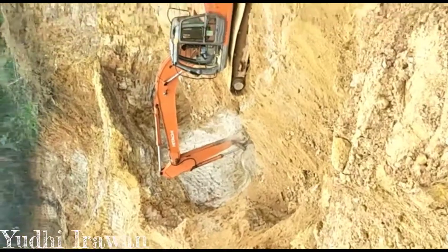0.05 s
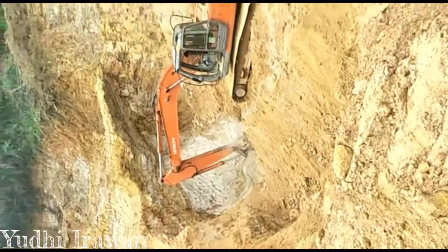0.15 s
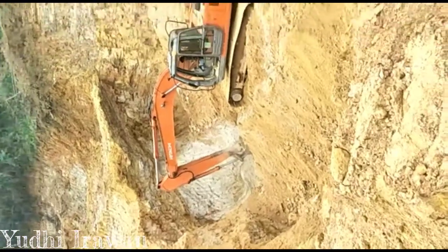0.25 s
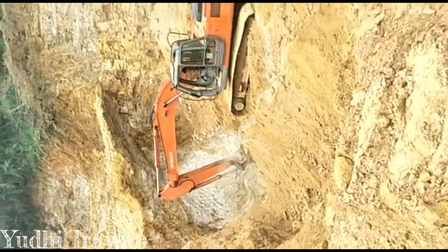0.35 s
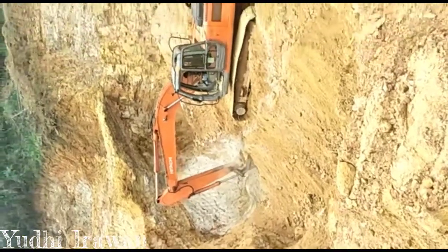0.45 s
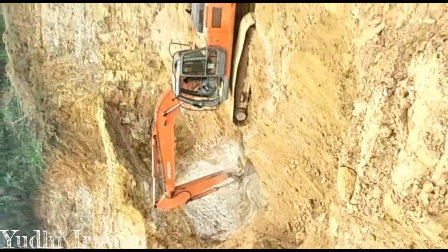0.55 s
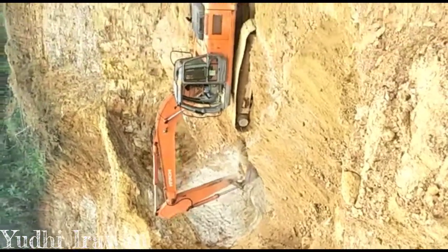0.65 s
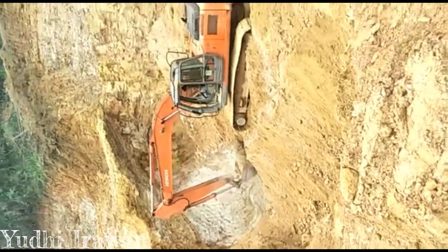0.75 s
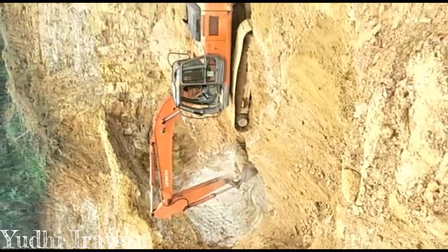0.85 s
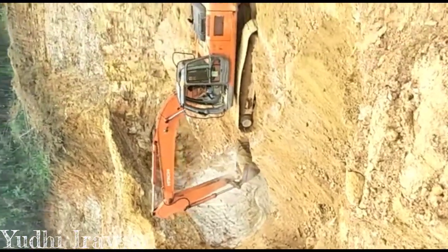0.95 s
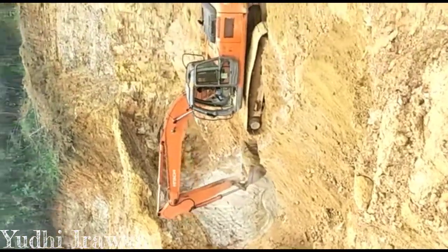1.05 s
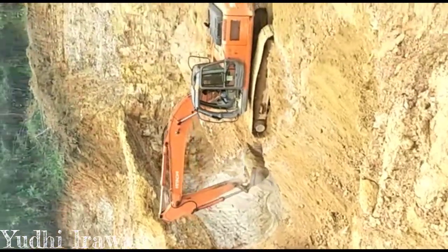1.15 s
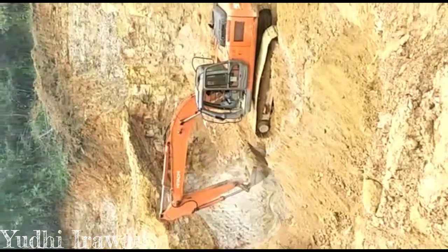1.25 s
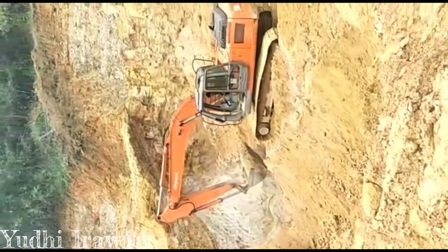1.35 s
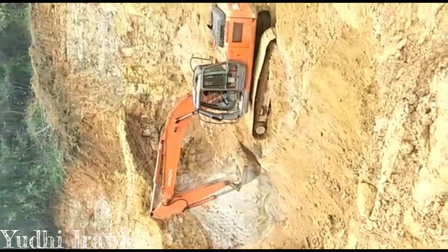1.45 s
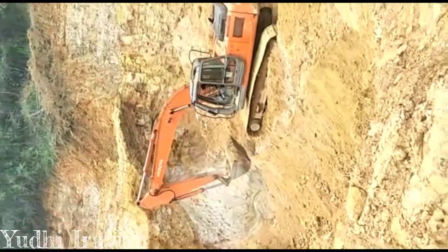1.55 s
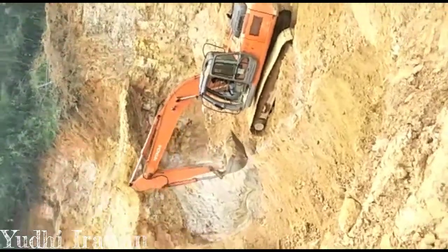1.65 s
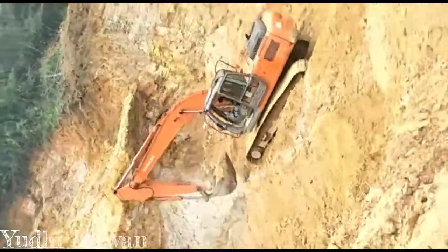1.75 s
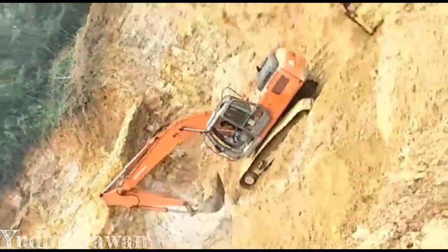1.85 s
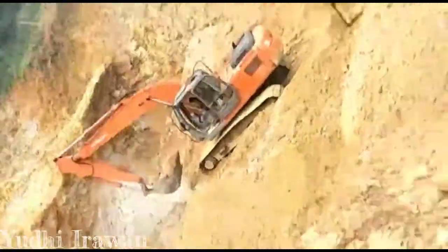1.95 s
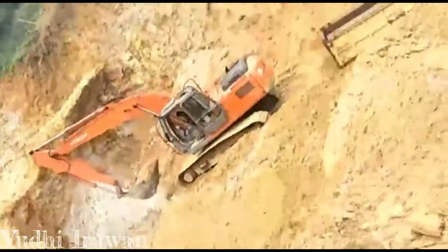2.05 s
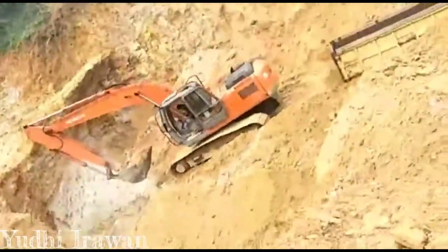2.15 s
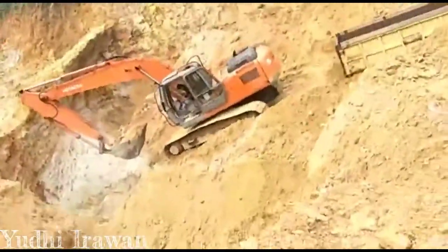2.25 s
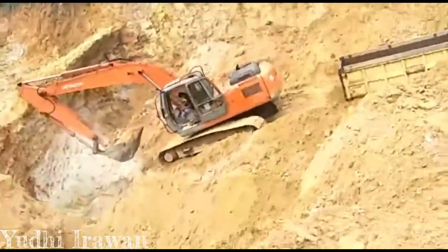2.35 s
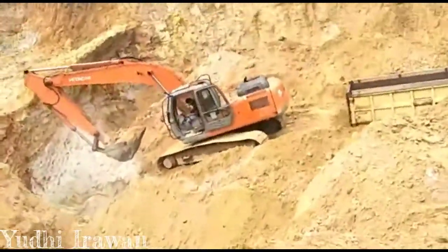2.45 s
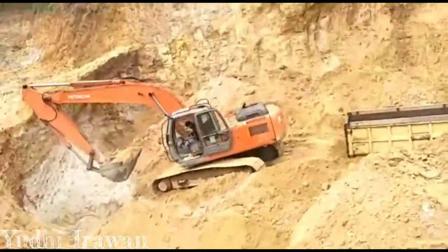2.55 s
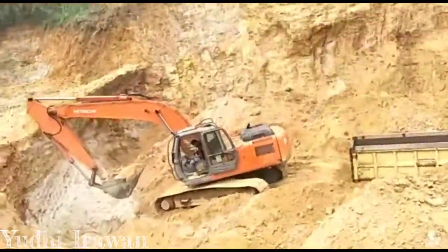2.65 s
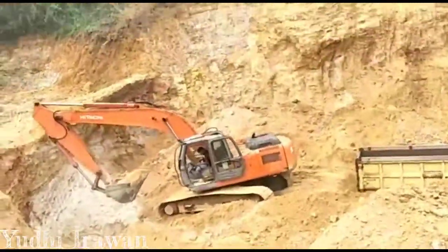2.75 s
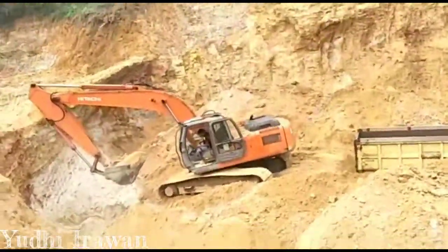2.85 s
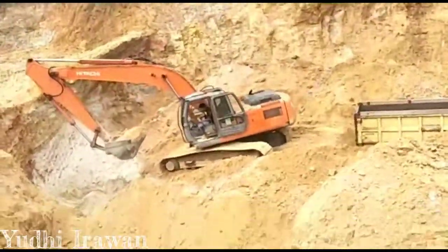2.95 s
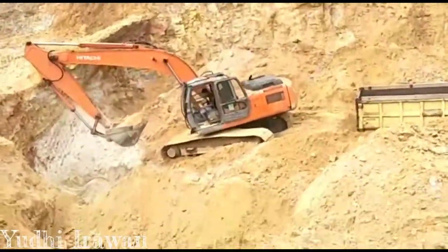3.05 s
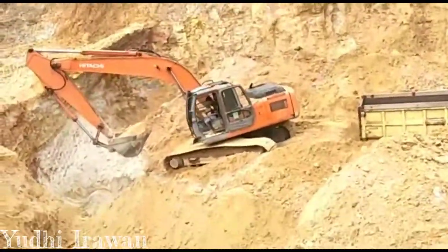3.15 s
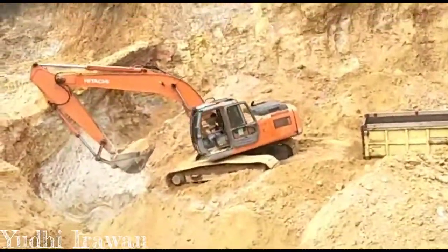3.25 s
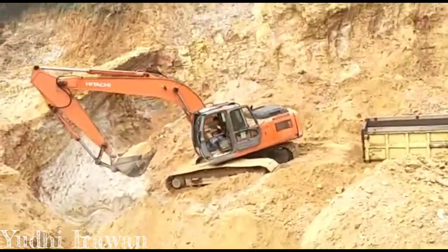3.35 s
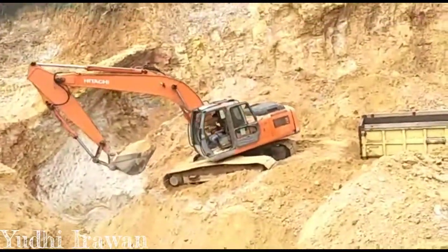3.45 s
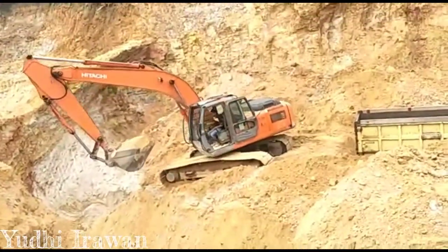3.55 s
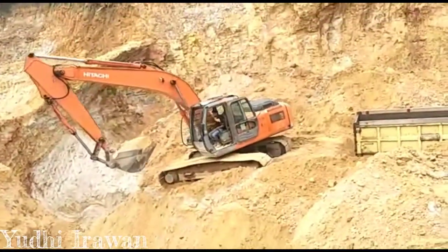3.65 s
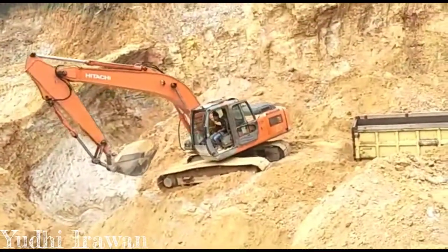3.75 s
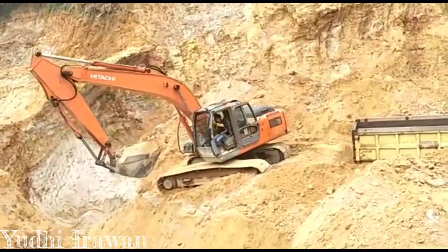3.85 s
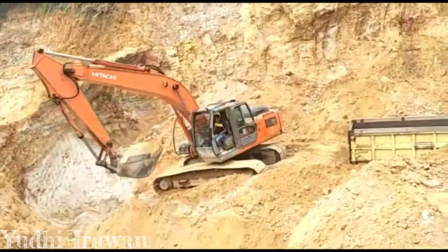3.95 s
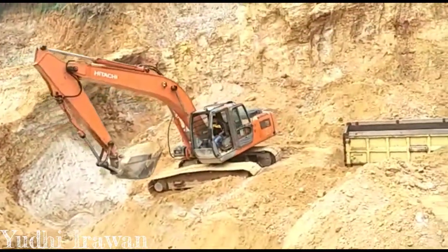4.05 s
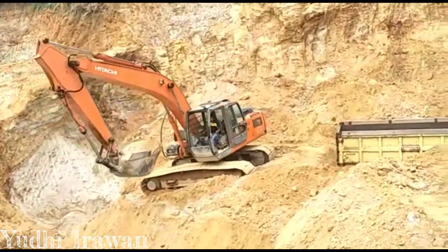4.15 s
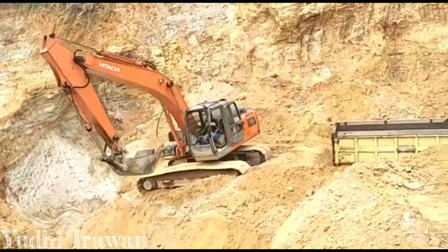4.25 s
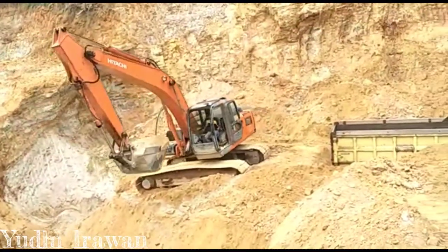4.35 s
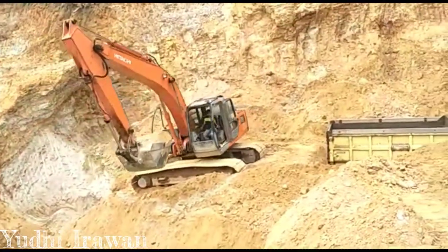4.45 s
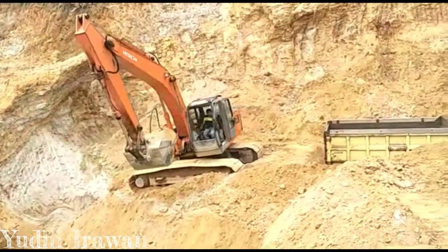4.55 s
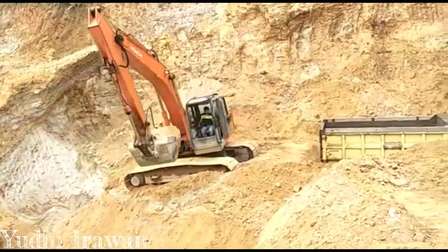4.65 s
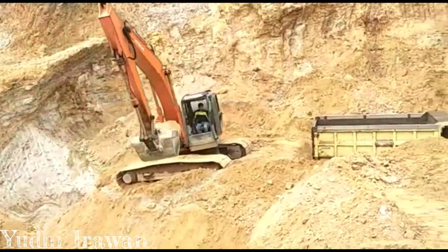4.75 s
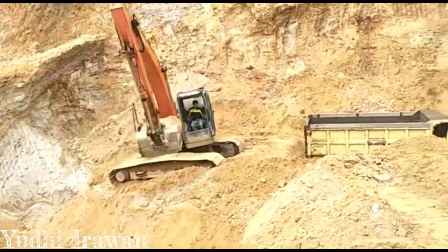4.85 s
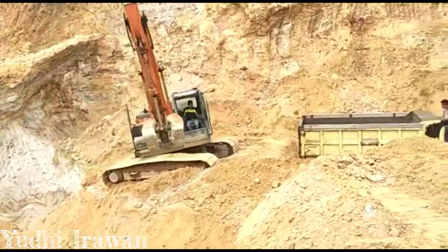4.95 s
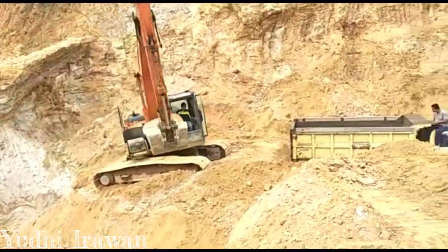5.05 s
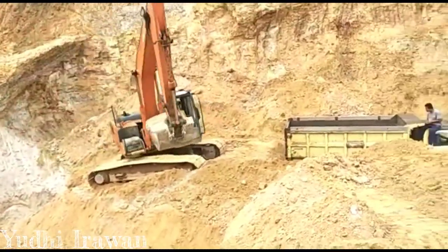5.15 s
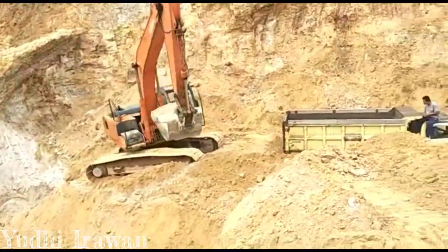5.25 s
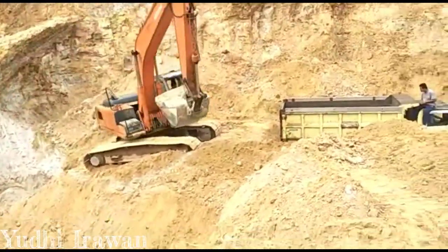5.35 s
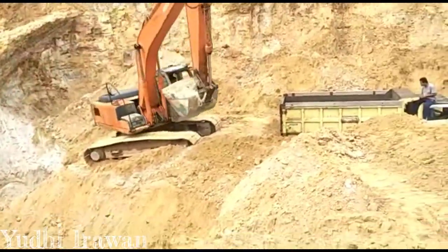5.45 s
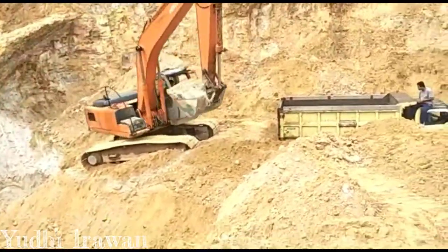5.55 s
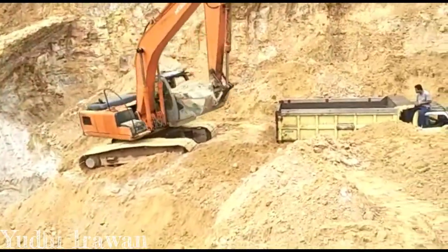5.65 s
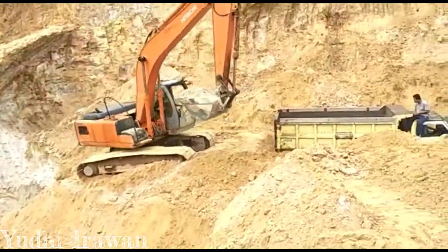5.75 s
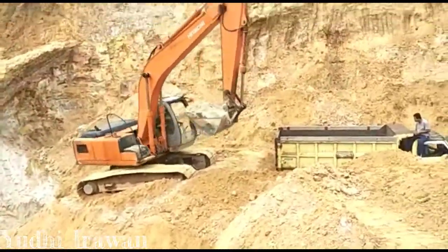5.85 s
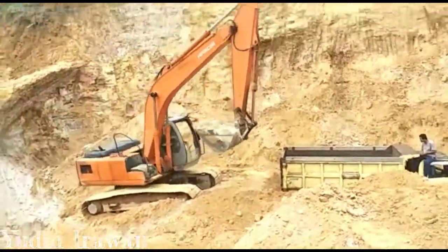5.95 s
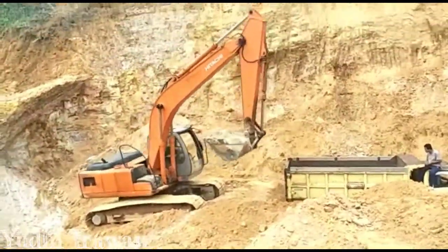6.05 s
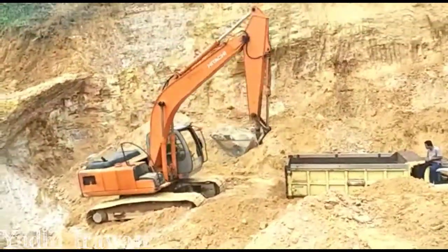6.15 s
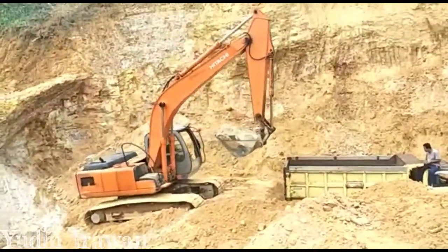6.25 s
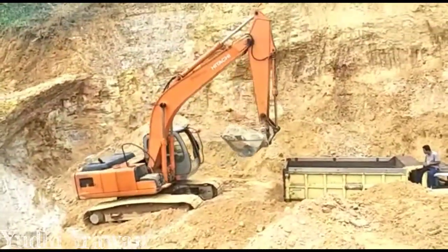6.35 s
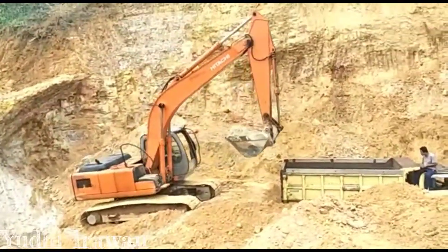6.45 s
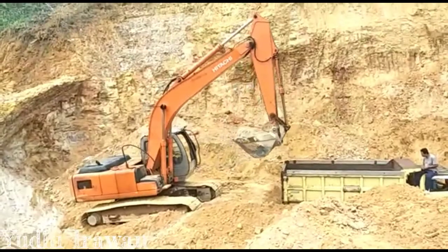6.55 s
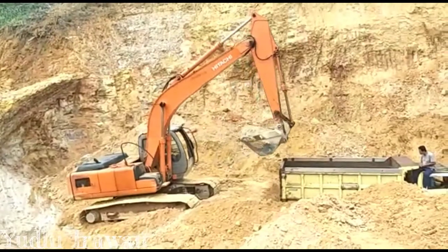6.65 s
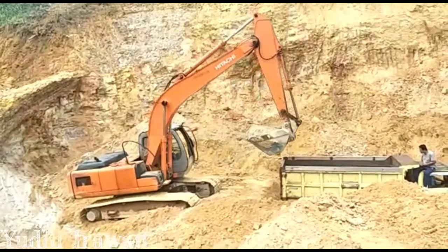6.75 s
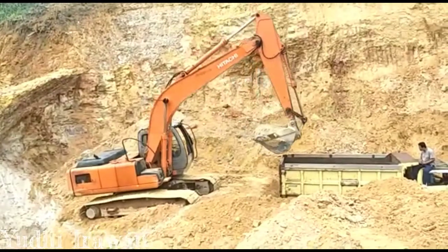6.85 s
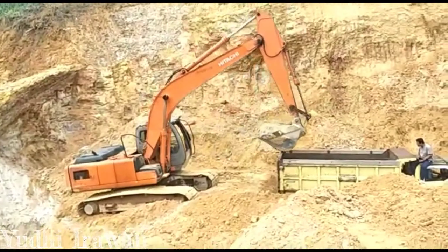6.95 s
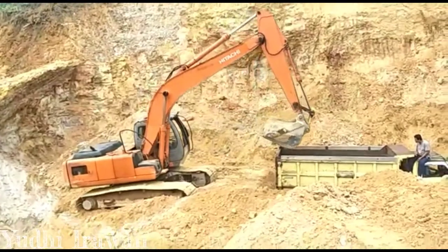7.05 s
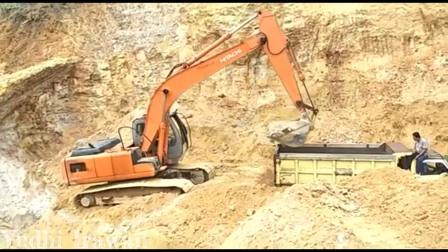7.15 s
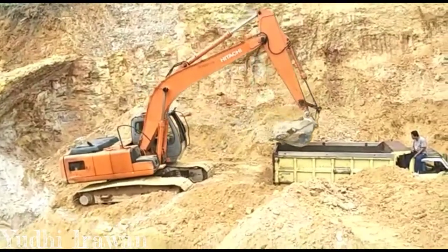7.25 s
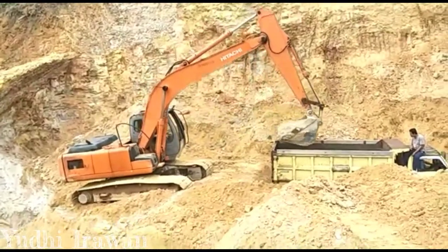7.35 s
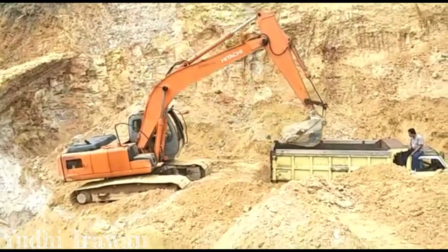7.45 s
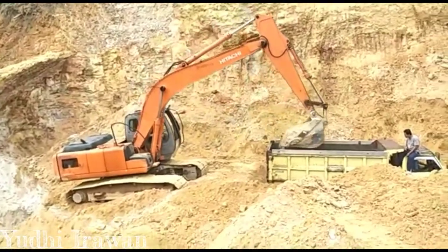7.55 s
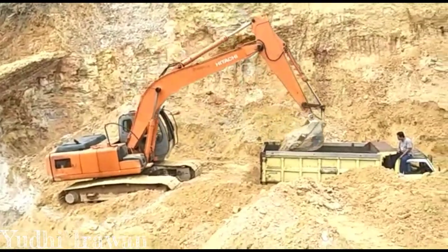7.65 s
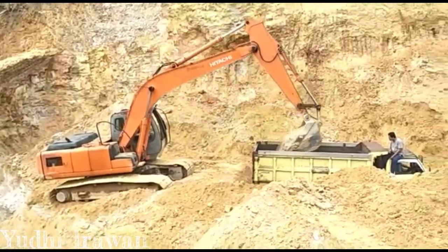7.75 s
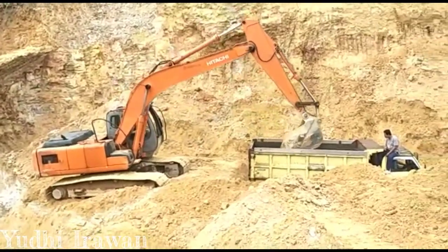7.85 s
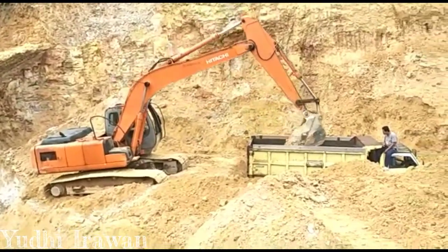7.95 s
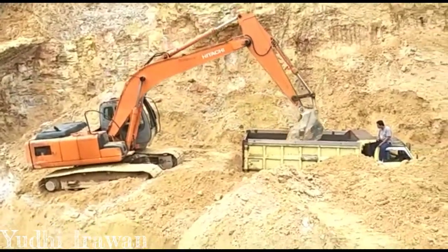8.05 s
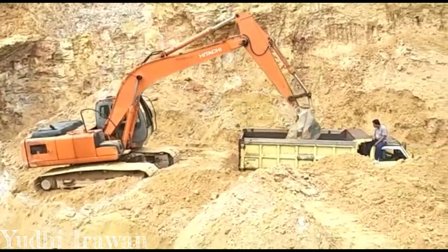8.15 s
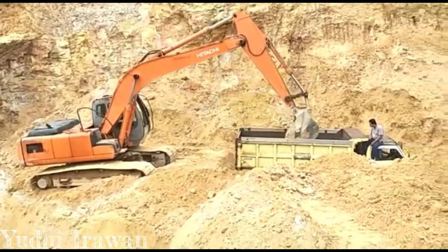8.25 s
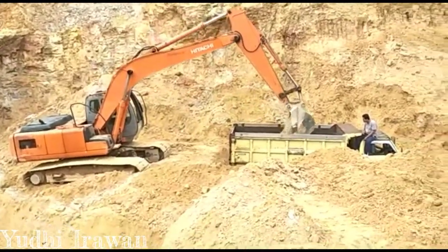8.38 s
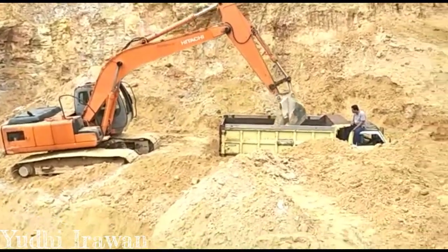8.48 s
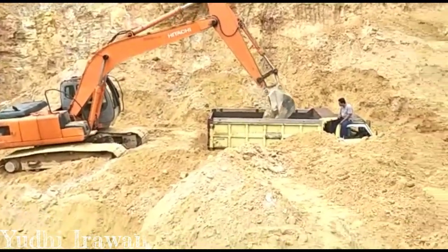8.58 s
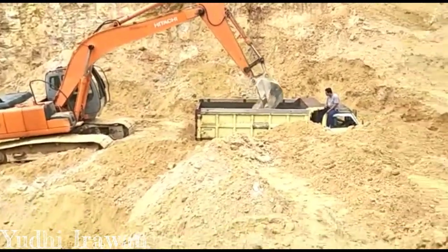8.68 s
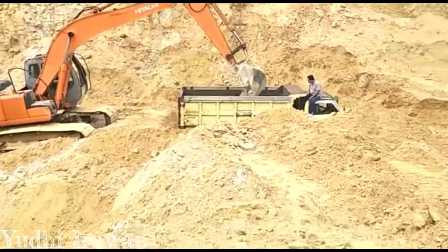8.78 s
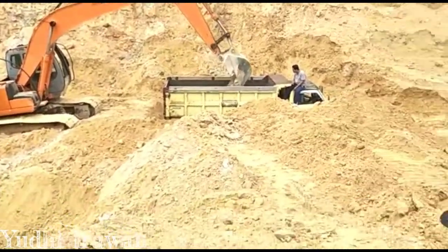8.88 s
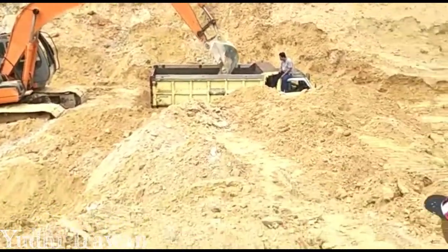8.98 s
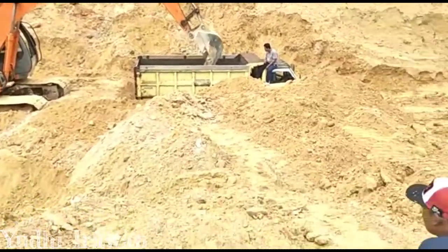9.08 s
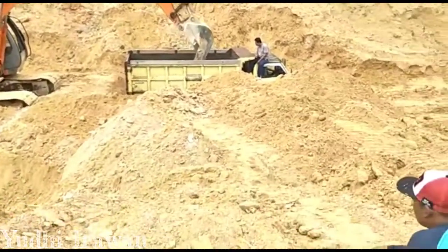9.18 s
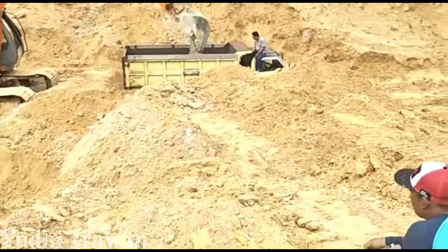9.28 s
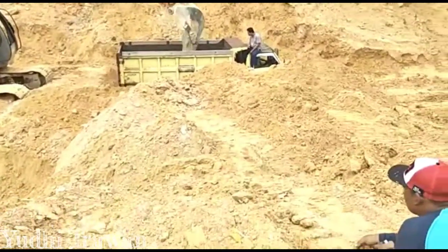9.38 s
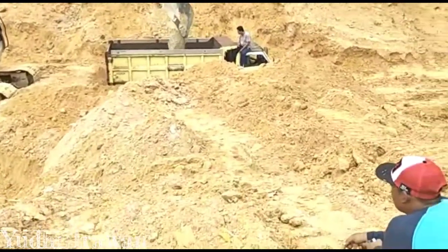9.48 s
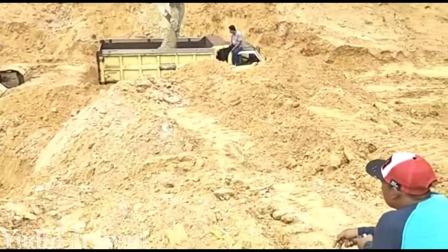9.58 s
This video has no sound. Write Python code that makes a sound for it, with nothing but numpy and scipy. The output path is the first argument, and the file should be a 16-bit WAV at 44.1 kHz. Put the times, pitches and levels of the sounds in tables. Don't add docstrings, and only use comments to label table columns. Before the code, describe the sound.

Outdoor quarry heard through a handheld stereo camera some metres away. A heavy diesel engine enters quickly after silence and drones at nearly constant speed, muffled at first. Low bucket thuds, soft oil hisses and a gliding hydraulic whine accompany the turn; the exhaust side then faces the microphone, stronger and more clattery. Near the end a rock crashes and rattles into a hollow metal bed, and the engine continues, shifting sideways as the camera pans.

```python
import sys
import numpy as np
from scipy import signal
from scipy.fft import rfft, irfft, next_fast_len
from scipy.io import wavfile
from scipy.ndimage import uniform_filter1d, map_coordinates

SR = 44100
rng = np.random.default_rng(int(sys.argv[2]) if len(sys.argv) > 2 else 0)


def magnitude_from_level(level_db):
    exponent = np.asarray(level_db, float) / 20
    return 10 ** exponent


def store_wav(level_fs):
    pcm = np.round(np.clip(np.atleast_2d(level_fs), -1, 1) * 32767)
    wavfile.write(sys.argv[1], SR, pcm.T.astype(np.int16))


N = 424241

# (time [s], pose [0-4])
POSE = [(0, 0.44), (1.5, 0.16), (2.3, 0.9), (3.4, 1.03), (4.6, 1.55), (5.2, 2.1), (6.1, 2.78), (6.8, 3.3),
        (8.8, 3.55), (9.62, 4.6)]


def along(points, hz):
    f, v = np.transpose(points)
    return np.interp(np.log(hz + 1), np.log(f + 1), v)


def curves(rows):
    s, *cols = np.transpose(rows)
    return [np.interp(np.arange(N) / SR, s, c) for c in cols]


def at_pose(values, pose):
    return np.interp(pose, range(len(values)), values)


def unit(x):
    return x / np.sqrt(np.mean(x ** 2) + 1e-20)


def wobble(rate):
    knots = rng.standard_normal(int(N * rate / SR) + 4)
    return map_coordinates(knots, [np.arange(N) * rate / SR], order=1)


def swell(t, s, length):
    return np.exp(-((t - s) / length * 2) ** 2)


def patches(shape, bins, frames):
    field = uniform_filter1d(rng.standard_normal(shape), size=bins, axis=0)
    return unit(uniform_filter1d(field, size=frames, axis=1))


def rush(spectrum, gate, patchy_db):
    hz, _, z = signal.stft(gate * rng.standard_normal((2, N)), SR, nperseg=1024)
    gain_db = along(spectrum, hz)[:, None] + patchy_db * patches(z.shape[1:], 6, 12)
    return unit(signal.istft(z * magnitude_from_level(gain_db), nperseg=1024)[1][:, :N])


def tone(turns, sway_db, drift):
    level = np.sqrt(2) * magnitude_from_level(sway_db * wobble(5))
    start = rng.uniform(0, 2 * np.pi)
    return level * np.sin(2 * np.pi * turns + start + drift * wobble(7))


def band(hz, width_hz, length):
    m = next_fast_len(length)
    f = np.fft.rfftfreq(m, 1 / SR)
    resonance = 1 / (1 + ((f - hz) / width_hz * 2) ** 2) ** 2
    return unit(irfft(rfft(rng.standard_normal(m)) * resonance, m)[:length])


def engine():
    # (time [s], shaft rate [Hz])
    speed = [(0.4, 33.5), (0.63, 33.4), (0.85, 34.0), (1.4, 33.85), (2.55, 33.7), (3.94, 33.5),
             (4.45, 33.8), (5.5, 33.85), (5.85, 34.0), (6.33, 33.85), (6.72, 33.0), (6.9, 32.9),
             (7.33, 33.7), (8.4, 33.9), (8.73, 34.4), (8.94, 34.3), (9.32, 33.2), (9.55, 33.4)]
    # (time [s], engine level [dB])
    engine_level = [(.56, -34), (1, -35), (1.5, -31.5), (2.5, -31.5), (3.9, -30.5), (4.5, -30.5),
                    (5.2, -28.5), (5.5, -24.5), (5.75, -23), (6, -21), (6.5, -21), (7.05, -20.5),
                    (7.55, -22), (8.2, -21.5), (8.42, -20), (8.8, -22), (9.62, -19.5)]
    block_db = (-11.5, -6, -9.5, -9.5, -11)
    rate, body_db, pose = (curves(rows)[0] for rows in (speed, engine_level, POSE))
    turns = np.cumsum(rate) / SR
    roar_db = body_db + at_pose(block_db, pose)
    lines = exhaust(turns, body_db, pose) + gear_whine(turns, body_db, pose)
    lines += injectors(turns, body_db, pose) + shaft_orders(turns, body_db, pose)
    lines += pump(turns, roar_db, pose)
    return engine_noise(turns, body_db, roar_db, pose) + [lines, 0 * lines]


def firings(turns, sizes, scatter_db, hz, width_hz):
    at = np.flatnonzero(np.diff(np.floor(3 * turns)))
    pulses = np.zeros(N)
    pulses[at] = np.resize(sizes, len(at)) * magnitude_from_level(scatter_db * rng.standard_normal(len(at)))
    edges_hz = [hz - width_hz / 2, hz + width_hz / 2]
    return unit(signal.sosfilt(signal.butter(2, edges_hz, "band", fs=SR, output="sos"), pulses))


def exhaust(turns, body_db, pose):
    # (time [s], firing tone level [dB])
    stack = [(.58, -28), (.9, -28), (1.5, -27), (2.2, -25), (3, -24), (4.5, -24), (4.9, -26.5), (5.2, -23),
             (5.45, -22), (5.75, -23), (5.95, -27), (6.35, -32.5), (6.8, -24.5), (7.1, -27), (7.5, -25),
             (8.3, -25), (8.75, -23), (9.2, -26)]
    cylinders = (1, 0.2, 0, 0.66, 0.24, 0)
    chug_db = (-9.5, -10.5, -10, -8.5, -12.5)
    sizes = np.subtract(cylinders, np.mean(cylinders))
    chug = firings(turns, sizes, scatter_db=3, hz=234, width_hz=282)
    firing = magnitude_from_level(curves(stack)[0]) * tone(3 * turns, sway_db=.5, drift=.05)
    return firing + magnitude_from_level(body_db + at_pose(chug_db, pose)) * chug


def shaft_orders(turns, body_db, pose):
    strong_order = [5.5, 6, 7, 9, 14, 24, 42]
    # (pose 0 [dB], 1 [dB], 2 [dB], 3 [dB], 4 [dB])
    strong = [(-6, -6.5, -7, -15.5, -13), (-21, -4, -7, -8.5, 0), (-15.5, -10, -8, -9.5, -10),
              (-13.5, -5.5, -16, -9.5, -12.5), (-12.5, -8, -10.5, -18, -9), (-21, -16, -18.5, -21, -18.5),
              (-30, -30, -40, -25.5, -13)]
    # (time [s], multiple of the shaft rate [ratio], peak [dB], length [s])
    flares = [(2.205, 14, -43.5, 0.62), (2.206, 7, -48, 0.51), (3.404, 9, -46.5, 1.1),
              (5.647, 9, -33.5, 0.22), (3.812, 6, -39.5, 0.53), (3.8, 7, -35.5, 0.47),
              (4.604, 14, -47, 0.48), (5.204, 7, -34, 0.6), (5.604, 5.5, -28.5, 0.99),
              (6.303, 7, -27.5, 0.24), (6.78, 7, -27.5, 0.47), (6.9, 5.5, -38, .6), (8.903, 5.5, -37, 0.35),
              (7.204, 14, -43, 1.4), (7.405, 6, -29, 1.8), (6.25, 24, -42, 0.27), (7.7, 24, -39, 0.9),
              (8.098, 14, -39.5, 0.9), (8.101, 7, -33, 0.98), (8.8, 9, -31, 0.39), (9.401, 7, -28, .5)]
    weak_order = [1.5, 2, 2.5, 4, 4.5, 5, 7.5, 8, 9.5, 10, 11, 12]
    # (pose 0 [dB], 1 [dB], 2 [dB], 3 [dB])
    weak = [(-27, -19, -14.5, -21), (-28, -20, -25, -24.5), (-26, -16.5, -23, -26),
            (-16.5, -12, -9.5, -26.5), (-29, -20.5, -13, -18), (-21, -15.5, -8.5, -13.5),
            (-11.5, -13, -11, -16), (-13, -12, -15.5, -18), (-17, -11.5, -11.5, -17),
            (-14.5, -18, -21.5, -21), (-16, -17, -21, -21), (-18, -27.5, -23, -20.5)]
    t = np.arange(N) / SR
    out = np.zeros(N)
    for k, db in zip(strong_order, strong):
        flare = sum(magnitude_from_level(peak_db) * swell(t, s, length)
                    for s, order, peak_db, length in flares if abs(order - k) < .3)
        level = magnitude_from_level(body_db + at_pose(db, pose) - 3.5) + flare
        out += level * tone(k * turns, sway_db=1.0, drift=0.47)
    for k, db in zip(weak_order, weak):
        out += magnitude_from_level(body_db + at_pose(db, pose)) * tone(k * turns, sway_db=2.5, drift=0.5)
    return out


def gear_whine(turns, body_db, pose):
    whine_db = (-21, -23, -27, -17, -11)
    slack = swell(np.arange(N) / SR, s=8.72, length=.6) ** .5
    flutter = 1.6 / (2 * np.pi) * slack * np.sin(2 * np.pi * turns)
    return magnitude_from_level(body_db + at_pose(whine_db, pose)) * tone(34 * turns + flutter, sway_db=2, drift=.45)


def pump(turns, roar_db, pose):
    pump_order = [21, 25, 26, 28]
    # (cab in front [dB], bay in front [dB])
    pump_level = [(-15.5, -17), (-11.5, -15), (-13.5, -19), (-16, -11.5)]
    out = np.zeros(N)
    for k, db in zip(pump_order, pump_level):
        level = magnitude_from_level(roar_db + np.interp(pose, (1.5, 2.8), db))
        out += level * tone(k * turns, sway_db=3.5, drift=0.92)
    return out


def injectors(turns, body_db, pose):
    tick_db = (-22, -27.5, -40, -27, -32)
    ticks = firings(turns, (0.96, .6, 0.99, 1, .7, .5), scatter_db=5, hz=4150, width_hz=800)
    return magnitude_from_level(body_db + at_pose(tick_db, pose)) * ticks


def engine_noise(turns, body_db, roar_db, pose):
    # (frequency [Hz], density [dB per Hz])
    body = [(12, -56), (20, -27), (43, -22.5), (69, -5), (103, -14), (126, -1.5), (152, -4), (307, -2),
            (537, -9.5), (620, -38), (810, -58.5), (1360, -120)]
    # (frequency [Hz], density [dB per Hz])
    roar = [(320, -45), (540, -6.5), (744, -1.5), (793, 1), (860, -2.5), (1060, -2.5), (1160, -5.5),
            (1230, -9.5), (1500, -21.5), (1950, -37.5), (3300, -120)]
    # (frequency [Hz], density [dB per Hz])
    clatter = [
        [(790, -44.5), (1350, 0), (1820, 1), (1980, -8.5), (2430, -4.5), (2940, -17.5), (3110, -0.5),
         (3520, -12.5), (3940, 1.5), (4630, -16.5), (6800, -20), (7000, -42.5), (9360, -72.5), (15800, -120)],
        [(790, -44.5), (1350, -9.5), (1490, -6), (1890, 2.5), (2130, 0), (2380, -9), (2590, -1.5), (3140, -10),
         (3400, 0.5), (3740, -11.5), (4090, -4.5), (7800, -30), (10100, -69), (17200, -120)],
        [(790, -11.5), (1350, -7.5), (1650, -6), (1860, -4), (2430, -2.5), (2760, -2), (3150, -8), (3600, -5.5),
         (4500, -8.5), (4860, -11.5), (5440, -11.5), (7200, -24.5), (9360, -52.5), (15800, -120)],
    ]
    # (frequency [Hz], density [dB per Hz])
    hiss = [(3880, -30.5), (6600, 1), (6940, -8), (7490, -7), (9560, -12), (10700, -19), (12400, -18),
            (13700, -10.5), (15600, -13)]
    clatter_level = (-13.5, -8.5, -13.5, -12, -12)
    hiss_level = (-56.5, -45, -39, -32, -34.5)
    shares = ((1, 0.045, 0.07, 0.00095), (0.066, 0.52, 0.24, 0.026), (0.13, 0.012, 0.36, 0.85))

    def beat(once, half, each):
        angle = np.pi * turns
        return magnitude_from_level(once * np.cos(2 * angle) + half * np.cos(3 * angle) + each * np.cos(6 * angle))

    noise = magnitude_from_level(body_db - 6.5) * rush(body, beat(3, .8, 1.1), patchy_db=0.74)
    noise += magnitude_from_level(roar_db - 1.24) * rush(roar, beat(0.32, .3, 0.4), patchy_db=0.7)
    clatter_db = body_db + at_pose(clatter_level, pose) + 3.0
    for colour, share in zip(clatter, shares):
        level = magnitude_from_level(clatter_db) * np.sqrt(at_pose(share, pose))
        noise += level * rush(colour, beat(0.35, 0.21, 0.25), patchy_db=1.5)
    hiss_db = body_db + at_pose(hiss_level, pose) + 4.0
    noise += magnitude_from_level(hiss_db) * rush(hiss, beat(.7, .9, .7), patchy_db=2.5)
    return noise


def swing():
    # (time [s], frequency [Hz], level [dB])
    glides = [
        [(3.8, 419, -52), (4.2, 449, -46), (4.6, 481.4, -37), (5, 498, -57), (5.3, 510, -68)],
        [(6.4, 300.8, -49), (6.8, 322.8, -34), (7.2, 346.8, -29), (7.5, 363, -44)],
    ]
    out = np.zeros(N)
    for hz, db in map(curves, glides):
        out += magnitude_from_level(db) * tone(np.cumsum(hz) / SR, sway_db=0.5, drift=0.94)
    return out


def bursts(events):
    out, t = np.zeros(N + SR), np.arange(SR // 2) / SR
    for s, db, hz, width_hz, t60 in events:
        onset = 1 - np.exp(-t / .0015)
        out[round(s * SR):][:len(t)] += magnitude_from_level(db - 6 - 60 * t / t60) * band(hz, width_hz, len(t)) * onset
    return out[:N]


def knocks():
    # (time [s], peak [dB], centre [Hz], width [Hz], t60 [s])
    blows = [(1.7978, -18, 165, 40, 0.19), (1.8, -29, 211, 30, .16), (2.03, -26, 265, 30.2, 0.27),
             (4.051, -26, 292, 80, 0.45), (6.2, -33, 870, 80, 0.1), (6.7, -21.5, 787, 60, 1),
             (7.5, -24, 248, 410, 0.31), (7.78, -21, 680, 80, .12), (7.95, -40, 790, 80, 0.11),
             (8.382, -18, 2700, 500, 0.09), (8.39, -19, 1290, 80, 0.15)]
    return bursts(blows)


def rock_in_bed():
    # (time [s], level [dB])
    tumble = [(8.342, -22), (8.363, -22.5), (8.382, -21), (8.396, -23.5), (8.41, -25.5), (8.424, -30)]
    # (centre [Hz], width [Hz], level [dB], t60 [s])
    bed = [(440, 130, -1.5, 0.42), (875, 710, 1, 0.34), (1870, 720, -2, 0.098), (2150, 3600, -0.5, 0.23)]
    return bursts([(s, db + bed_db, hz, width_hz, t60)
                   for s, db in tumble for hz, width_hz, bed_db, t60 in bed])


def clanks():
    # (time [s], peak [dB], frequency [Hz], t60 [s])
    strikes = [(8.3422, -19.5, 1880, 0.026), (8.3433, -26, 2860, 0.035), (8.3425, -29, 4000, .02),
               (8.364, -22, 2800, 0.039), (8.3828, -16.5, 2760, 0.038), (8.3905, -23.5, 3590, .03),
               (8.396, -17.5, 2170, 0.034), (8.4, -24, 4100, 0.021), (8.401, -15.5, 1864, 0.032),
               (8.4265, -11.5, 890, 0.011)]
    out, t = np.zeros(N), np.arange(SR // 10) / SR
    for s, db, hz, t60 in strikes:
        out[round(s * SR):][:len(t)] += magnitude_from_level(db - 60 * t / t60) * np.sin(2 * np.pi * hz * t)
    return out


def valves():
    # (time [s], peak [dB], centre [Hz], width [Hz], length [s])
    hisses = [(1.45, -51.5, 5100, 2100, .6), (2, -60, 5300, 990, 0.22), (2.15, -44.5, 5700, 2400, 0.8),
              (2.58, -45.5, 3660, 370, 0.49), (3.24, -70.5, 13500, 3350, 0.38),
              (4.797, -53, 4000, 450, 0.22), (5.05, -45, 3470, 430, 0.12), (5.45, -37, 3460, 430, 0.44),
              (5.25, -54.5, 7500, 1400, .6), (2.1, -54, 6800, 700, 0.24), (.65, -65, 7500, 300, .25),
              (1.3, -65, 7600, 400, 0.55), (9.41, -43.5, 6330, 1600, 0.55), (1.8, -74.5, 8600, 59.4, 1.6),
              (3.6, -79, 8700, 60.7, 1.8), (1.6, -79.5, 10250, 500, .6), (2.23, -71, 11000, 2000, 0.29)]
    t = np.arange(N) / SR
    return sum(magnitude_from_level(db) * swell(t, s, length) * band(hz, width_hz, N)
               for s, db, hz, width_hz, length in hisses)


def ground_echo(hz, t, pose):
    # ground echo delay [ms], then its strength [ratio]
    echo_delay = (1.6, 1.1, 1.25, 1.254, 1.247)
    echo_strength = (0.074, 0.072, 0.089, 0.11, 0.26)
    # centre [Hz], then depth [0-1]
    notch_centre = (592, 534, 540, 553, 579)
    notch_depth = (0.26, 0.63, 0.98, 0.79, 1)
    # (time [s], length [s], centre [Hz], slide [Hz per s], width [Hz], depth [0-1])
    pans = [(2.15, .22, 4680, -1300, 220, .85), (9.18, .14, 5550, -1500, 250, .7),
            (9.47, .22, 5000, -900, 400, .9), (9.1, .25, 7500, 0, 800, .6), (8.93, .14, 1620, 0, 170, .95),
            (9.36, .06, 1600, 0, 220, .92), (6.6, .2, 6150, 0, 250, .7), (8.7, .12, 6050, 0, 250, .75)]
    hz_col = hz[:, None]
    delayed = np.exp(-2j * np.pi * np.outer(hz, at_pose(echo_delay, pose)) / 1000)
    ground = 1 - at_pose(echo_strength, pose) * (hz_col > 1000) * delayed
    off_notch = (hz_col - at_pose(notch_centre, pose)) / 93 * 2
    ground = ground * (1 - at_pose(notch_depth, pose) / (1 + off_notch ** 2))
    for s, length, pan_hz, slide, width_hz, depth in pans:
        off_band = (hz_col - pan_hz - slide * (t - s)) / width_hz * 2
        ground = ground * (1 - depth * swell(t, s, length) ** .5 / (1 + off_band ** 4))
    return ground


def microphone_pair(hz, t, pose):
    # (time [s], lead [samples])
    lead_curve = [(0, 8.5), (1.4, 7), (1.75, 5.5), (2.1, 3.5), (2.35, 1), (2.6, 0), (4.5, .7), (5.2, 3),
                  (5.9, 7), (7.5, 9), (8.3, 10), (8.7, 13.5), (9.62, 17)]
    # (frequency [Hz], share of the lead [ratio])
    lead_share = [(100, 1.5), (200, 0.23), (400, 1.2), (800, 0.68), (1500, 0.87)]
    # (frequency [Hz], left minus right [dB])
    side_tilt = [(100, -.4), (200, -.3), (400, -2.5), (740, 2), (1250, -5), (2200, -1), (4400, .3),
                 (9000, -1.5)]
    # (frequency [Hz], phase [rad], left minus right [dB])
    ports = [
        [(500, 0, 0), (900, -.3, 2.5), (2000, .1, -1), (3000, 0, 5), (4000, 2.3, 2), (5800, 2.5, 1.5)],
        [(500, 0, 0), (900, .1, -.3), (2000, 0, -1), (3000, 0, 2), (4000, -.8, -.5), (5800, 0, 1.5)],
        [(500, 0, 0), (900, -.1, -.8), (2000, 0, .3), (3000, 1.2, .8), (4000, -1.6, -1), (5800, 0, .8)],
    ]
    shares = [np.interp(pose, (0, 1, 3), share) for share in np.eye(3)]
    port_rad, port_db = (sum(np.outer(along(np.take(c, (0, k), axis=1), hz), share)
                             for c, share in zip(ports, shares)) for k in (1, 2))
    samples = np.interp(t, *np.transpose(lead_curve))
    lead = np.exp(1j * np.pi * np.outer(hz * along(lead_share, hz), samples) / SR)
    lead = np.exp(.5j * port_rad) * lead
    treble = 1 / (1 + (4500 / (hz + 1)) ** 6)
    sweep_db = 5 * np.outer(treble, swell(t, s=2.1, length=.7))
    tilt = magnitude_from_level((along(side_tilt, hz)[:, None] + port_db - sweep_db) / 2)
    return lead, tilt


def scene():
    # (frequency [Hz], likeness [0-1])
    likeness = [(100, .988), (400, .99), (800, .97), (1500, .93), (3000, .8), (6000, .78), (12000, .6)]
    clear_view = (0.56, 0.52, 0.17, 0.27, 0.31)
    direct, scattered = engine()
    hz, t, z = signal.stft([direct + swing() + valves(), scattered], SR, nperseg=1024)
    pose = np.interp(t, *np.transpose(POSE))
    hidden = at_pose(clear_view, pose) ** np.clip(hz[:, None] / 2000 - .4, 0, 1)
    alike = along(likeness, hz)[:, None] * hidden
    turn = np.arccos(np.clip(alike, 0, 1)) / 2
    ground = ground_echo(hz, t, pose)
    lead, tilt = microphone_pair(hz, t, pose)
    near = np.cos(turn) * z[0] * ground
    far = np.sin(turn) * z[1] * abs(ground)
    pair = np.array([(near + far) * lead * tilt, (near - far) / lead / tilt])
    machine = signal.istft(pair, nperseg=1024)[1][:, :N]
    steel = knocks() + rock_in_bed() + clanks()
    return machine + steel * magnitude_from_level([[-.4], [.4]])


def drop_masked_bands(x):
    # (frequency [Hz], margin [dB])
    margin = [(3000, 13), (4200, 7.5), (4800, 4.5), (5500, 6.5), (6200, 5.5), (6800, 3), (15000, 3.5)]
    spare = (6, 2.5, 1, 0, 0)
    hz, t, z = signal.stft(x, SR, nperseg=1024)
    power = uniform_filter1d(np.mean(np.abs(z) ** 2, axis=0), size=3, axis=1)
    spare_db = at_pose(spare, np.interp(t, *np.transpose(POSE)))
    narrow = uniform_filter1d(power, size=4, axis=0)
    wide = uniform_filter1d(power, size=40, axis=0)
    chance = patches(power.shape, 4, 5)
    margin_db = along(margin, hz)[:, None] + spare_db + 2.8 * chance
    kept = narrow > wide * magnitude_from_level(-2 * margin_db)
    clatter = power[(hz > 2000) & (hz < 6800)].mean(axis=0)
    loud_enough = narrow > clatter * magnitude_from_level(-2 * (31.5 - spare_db + chance))
    kept &= loud_enough | ((hz < 6800) | (hz > 9800))[:, None]
    kept = kept | (hz[:, None] < margin[0][0])
    return signal.istft(z * kept, nperseg=1024)[1][:, :N]


def band_limit(x):
    return signal.sosfilt(signal.butter(12, 16060, fs=SR, output="sos"), x)


def record(dry):
    # (centre [Hz], width [Hz], depth [0-1])
    housing = [(4700, 60, .5), (4960, 90, .5), (6720, 260, .72), (7500, 200, .4), (8030, 330, 0.35),
               (9340, 400, 0.6), (12700, 500, .5)]
    # (time [s], level [dB])
    fade_in = [(.284, -31), (.3, -13.5), (.33, -12), (.43, -5.5), (.56, 0.5)]
    m = next_fast_len(N)
    f = np.fft.rfftfreq(m, 1 / SR)
    dips = np.prod([1 - depth / (1 + ((f - hz) / width_hz * 2) ** 2)
                    for hz, width_hz, depth in housing], axis=0)
    heard = irfft(rfft(dry, m) * dips * (f < 15530), m)[:, :N]
    fade = magnitude_from_level(curves(fade_in)[0]) * (np.arange(N) / SR > fade_in[0][0])
    return band_limit(drop_masked_bands(heard) * fade)


dry = scene()
out = record(dry)
store_wav(out)
```